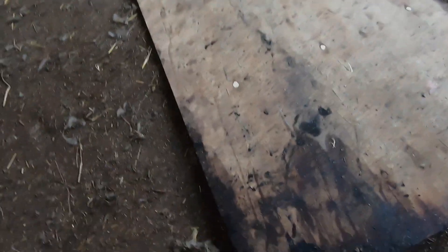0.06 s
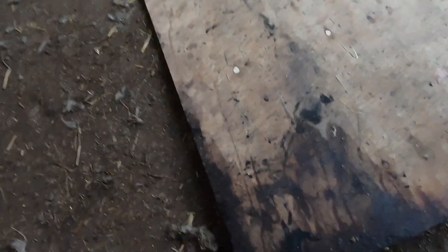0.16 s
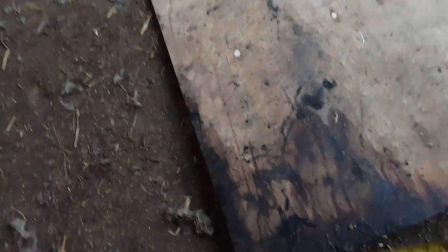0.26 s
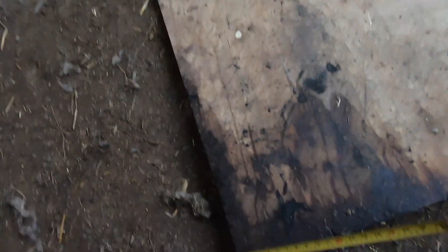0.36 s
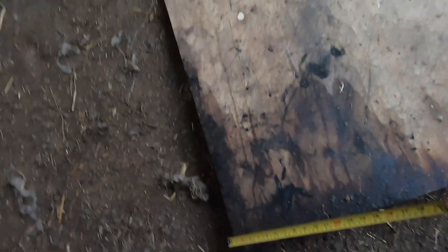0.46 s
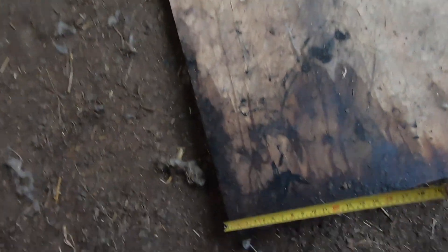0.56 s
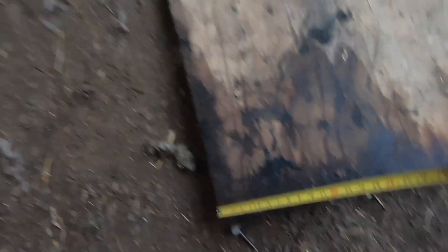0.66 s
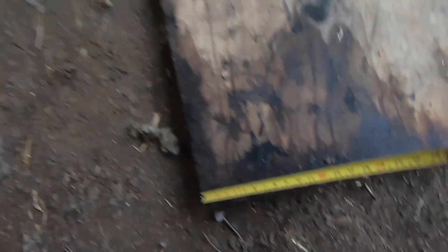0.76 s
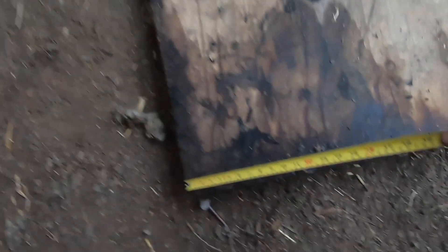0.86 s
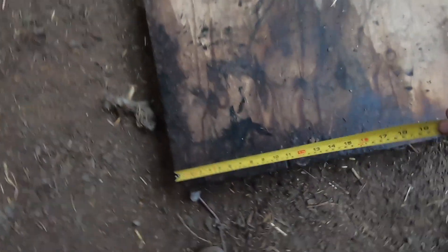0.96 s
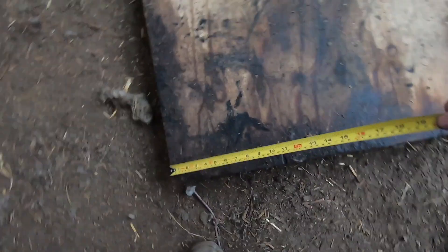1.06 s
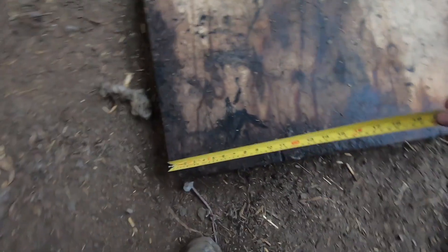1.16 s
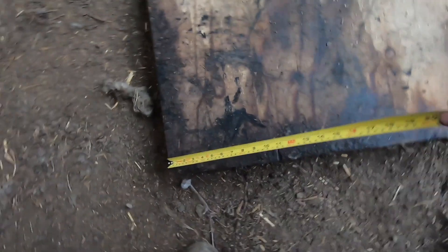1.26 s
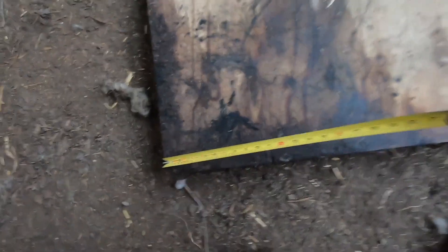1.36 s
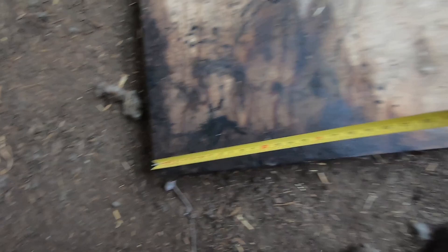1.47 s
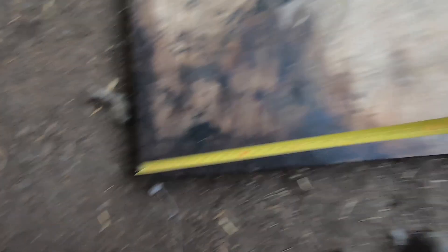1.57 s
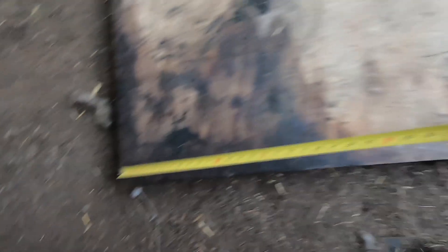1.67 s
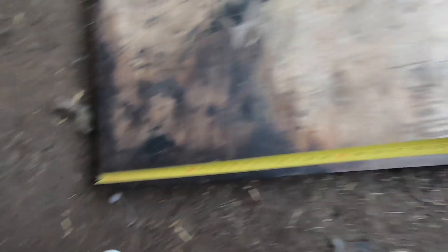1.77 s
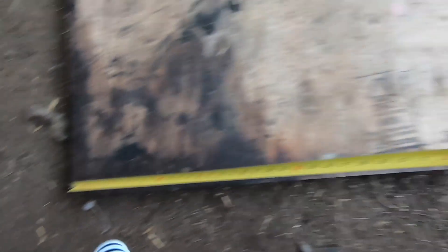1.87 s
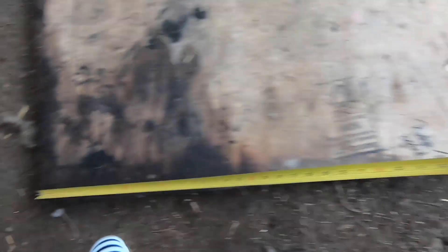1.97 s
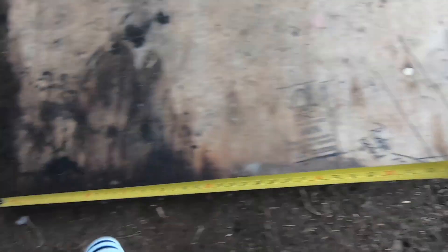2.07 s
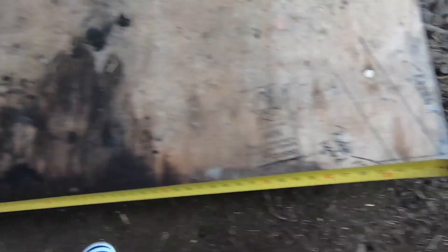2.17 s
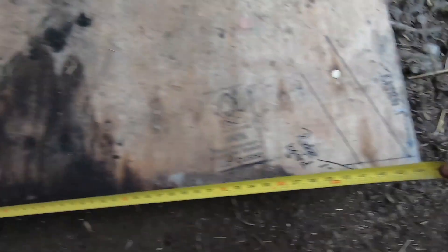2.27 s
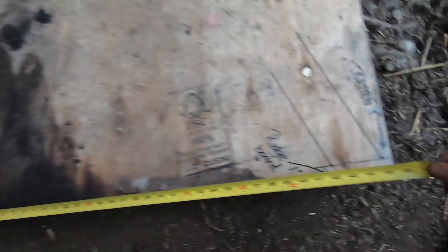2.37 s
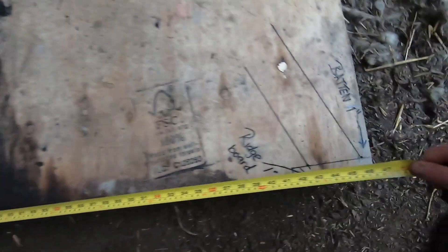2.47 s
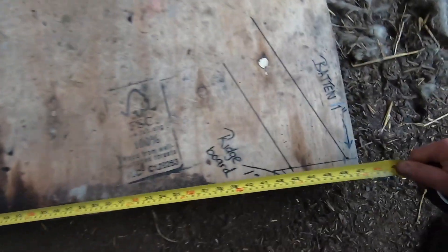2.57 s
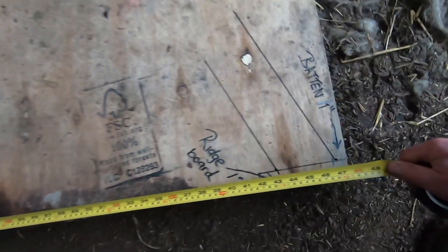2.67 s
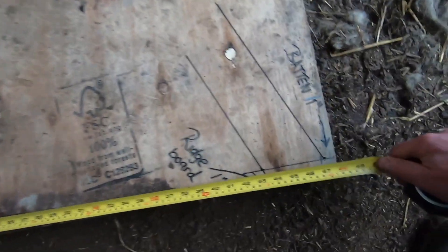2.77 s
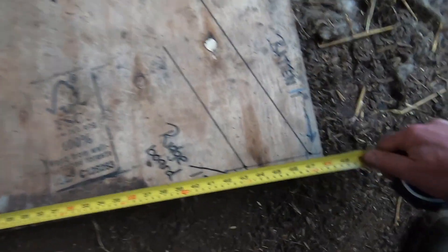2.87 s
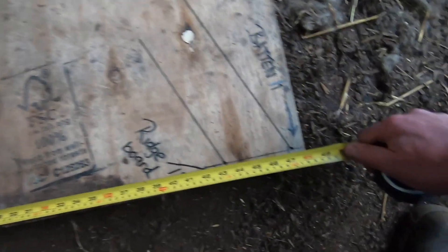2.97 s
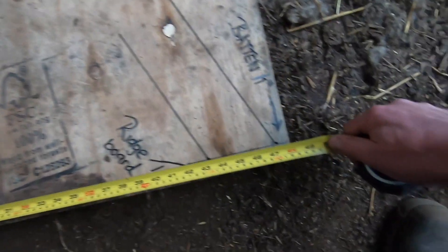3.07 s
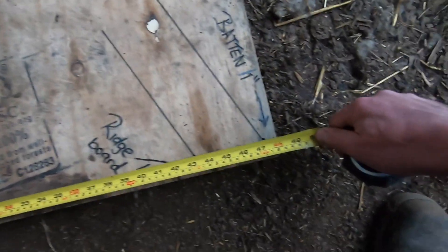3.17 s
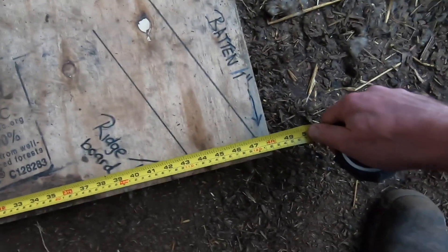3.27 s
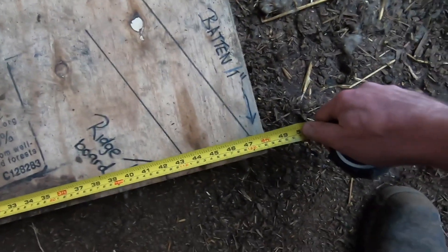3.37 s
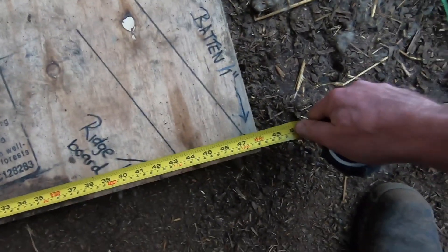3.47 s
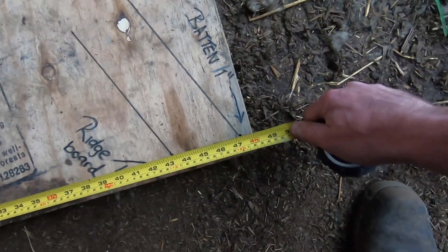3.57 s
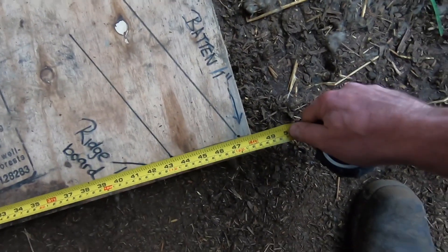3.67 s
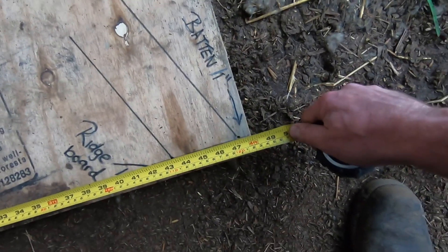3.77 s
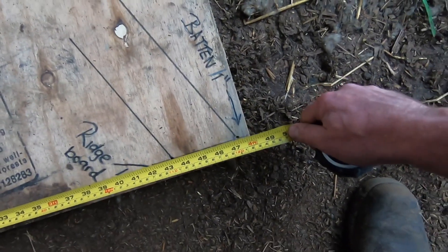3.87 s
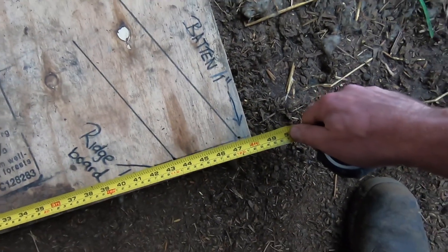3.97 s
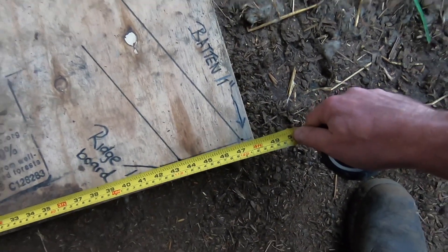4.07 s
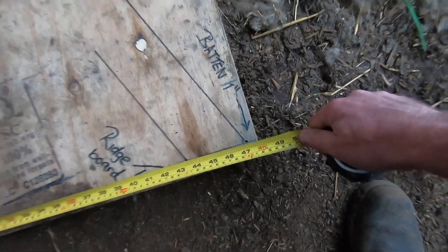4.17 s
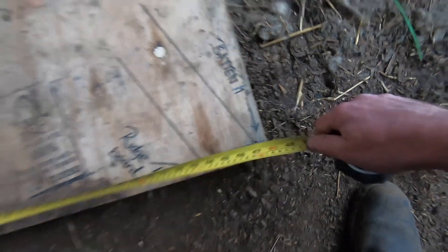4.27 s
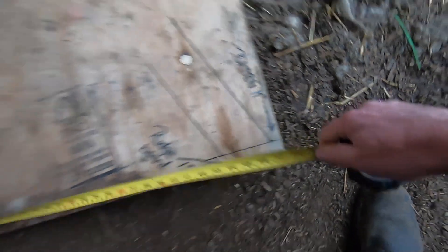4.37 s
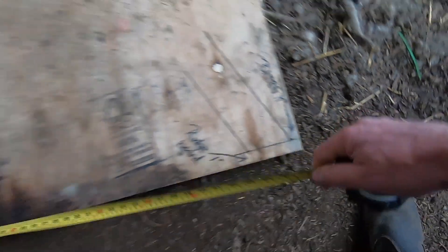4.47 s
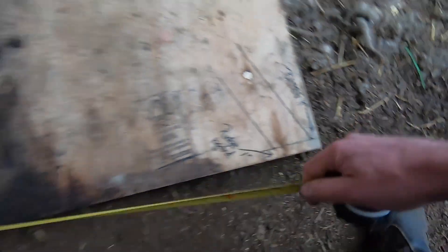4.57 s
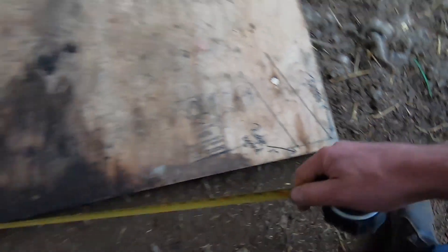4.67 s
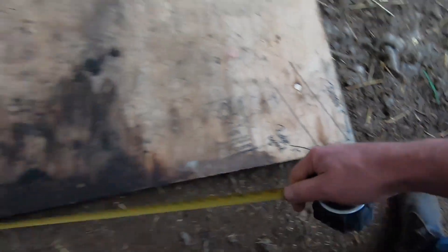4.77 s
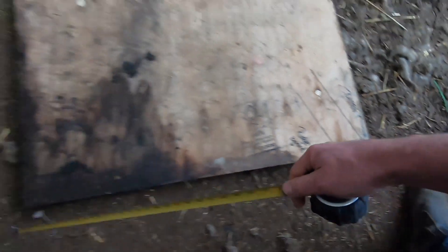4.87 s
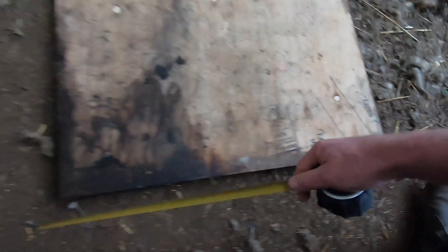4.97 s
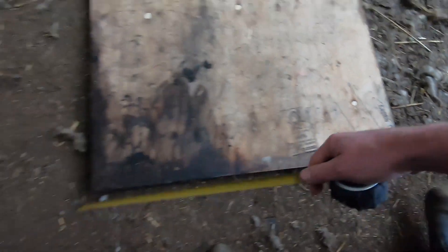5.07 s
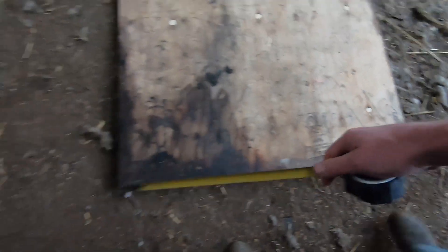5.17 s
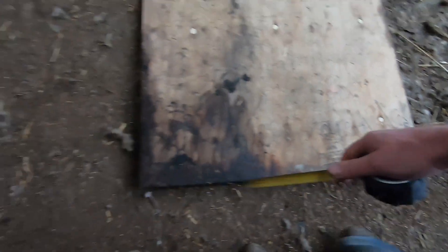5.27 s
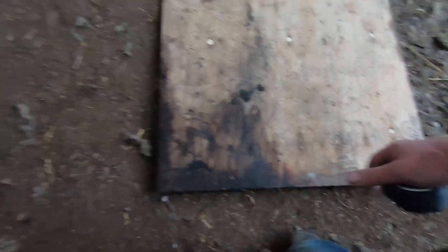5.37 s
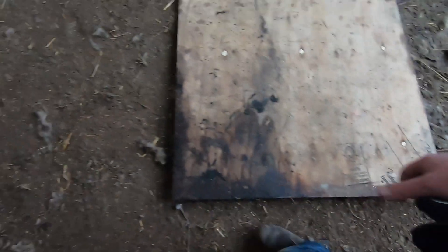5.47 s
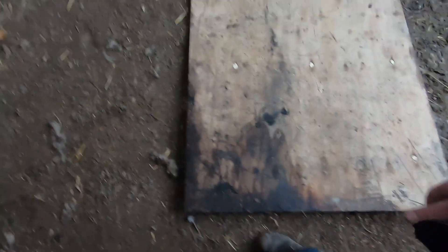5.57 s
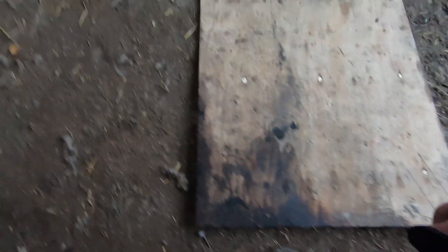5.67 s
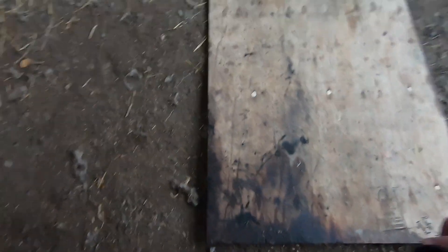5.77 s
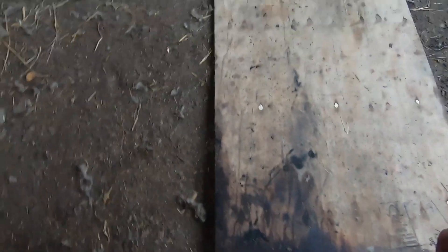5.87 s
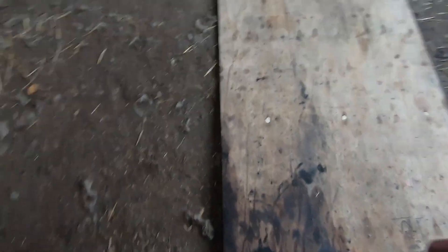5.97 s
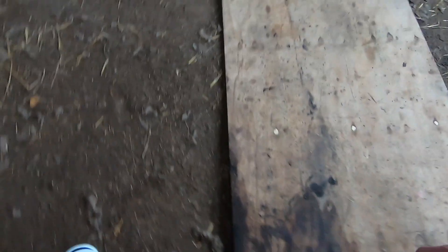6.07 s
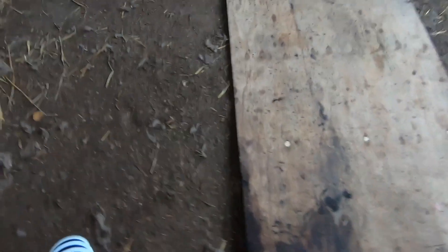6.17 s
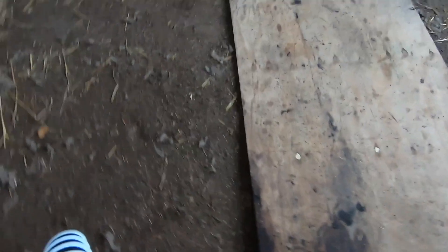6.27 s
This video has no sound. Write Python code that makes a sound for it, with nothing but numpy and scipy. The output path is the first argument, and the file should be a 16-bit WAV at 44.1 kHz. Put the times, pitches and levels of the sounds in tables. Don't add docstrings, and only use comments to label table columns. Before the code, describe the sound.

Thin steel tape slides out with a scratchy hiss over a wooden board, rests, rattles back into its case and ends with a hard snap.

```python
import sys
import numpy as np
from scipy import signal
from scipy.fft import rfft, irfft, next_fast_len
from scipy.io import wavfile
from scipy.ndimage import uniform_filter1d

SR = 44100
rng = np.random.default_rng(int(sys.argv[2]) if len(sys.argv) > 2 else 0)


def attenuation_scalar(level_db):
    decades = np.asarray(level_db, float) / 20
    return 10 ** decades


def dump_mix(stems):
    frames = np.atleast_2d(stems).T
    limited = np.clip(frames, -1, 1)
    pcm = np.round(limited * 32767).astype(np.int16)
    wavfile.write(sys.argv[1], SR, pcm)


N = 279347
TIMES_S = np.arange(0, N + 64, 64) / SR


def evened(x):
    return x / np.sqrt(np.mean(x ** 2) + 1e-20)


def read(points, hz):
    table_hz, value = np.transpose(points)
    return np.interp(np.log(hz + 1), np.log(table_hz + 1), value)


def curves(rows):
    s, *columns = np.transpose(rows)
    return [np.interp(TIMES_S, s, column) for column in columns]


def fine(control):
    return np.interp(np.arange(N) / SR, TIMES_S, control)


def summed(levels_db):
    return 10 * np.log10(sum(attenuation_scalar(2 * db) for db in levels_db))


def add(mix, s, sound):
    part = mix[:, round(s * SR):][:, :sound.shape[1]]
    part += sound[:, :part.shape[1]]


def sides(pan_db):
    return attenuation_scalar(np.array([pan_db / 2, -pan_db / 2]))


def bends(modes, hz):
    power = sum(attenuation_scalar(2 * db) / (1 + (2 * (hz - mode_hz) / width_hz) ** 2) for mode_hz, width_hz, db in modes)
    return 10 * np.log10(power + 1e-9)


def smoothed_noise(count, width):
    return evened(uniform_filter1d(rng.standard_normal(count), width))


def wander(seconds):
    width = round(seconds * SR)
    return evened(uniform_filter1d(smoothed_noise(N, width), width))


# frequency in Hz, left-right likeness 0-1.
LIKENESS = [(130, 0.8), (600, 0.68), (1400, 0.23), (3100, 0.83), (6800, 0.028), (15000, 0.09)]


def ports(drives, colour_db, likeness=None):
    size = next_fast_len(drives.shape[1])
    hz = np.fft.rfftfreq(size, 1 / SR)
    a, b = rfft(drives, size)
    c = np.clip(read(LIKENESS, hz) if likeness is None else likeness, 0, 1)
    coloured = np.array([a, c * a + np.sqrt(1 - c ** 2) * b]) * attenuation_scalar(colour_db(hz))
    return evened(irfft(coloured, size)[:, :drives.shape[1]])


def rub(spectrum, flutter_db, grit_db, likeness=None, patch_db=0):
    drive = rng.standard_normal((2, N)) * attenuation_scalar(flutter_db * wander(0.049) + grit_db * wander(0.00015))
    if patch_db:
        z = signal.stft(drive, nperseg=512)[2]
        spots = rng.standard_normal((2, *z.shape[1:]))
        streaks = evened(uniform_filter1d(spots[0], size=26, axis=1))
        patches = evened(uniform_filter1d(uniform_filter1d(spots[1], size=7, axis=0), size=9, axis=1))
        z = z * attenuation_scalar(patch_db * (0.9 * streaks + 0.62 * patches))
        drive = signal.istft(z, nperseg=512)[1][:, :N]
    return ports(drive, lambda hz: read(spectrum, hz), likeness)


# frequency in Hz, level in dB per Hz.
SHED = [(150, -17.5), (250, -9), (400, -14.5), (580, -18.5), (800, -9), (1000, -19), (1500, -18.5),
        (3000, -28.5), (7400, -42), (9000, -39), (15500, -65)]


def shed_air():
    return attenuation_scalar(-67.5) * rub(SHED, 0.27, 0.26, 0.035)


# start in seconds, sheet dB, air dB, rise in seconds, fall in seconds.
SHIFTS = [(0, -61, -55, .1, 0.24), (.88, -67, -55.5, 0.49, 0.44), (1.42, -43.5, -63, 0.16, 0.083),
          (1.59, -48, -50, 0.14, 0.21), (1.75, -54.5, -67, 0.51, 0.74), (2.1, -63, -51, 0.046, 0.074),
          (2.57, -89, -48.5, 0.54, 0.062), (4.55, -58, -51, 0.19, 0.29), (4.73, -47, -70, 0.39, 0.22),
          (5.66, -56, -66, 0.11, 0.18), (6.21, -63, -74, 0.6, 0.22)]


def shifts():
    sheet_db, air_db = [], []
    for s, sheet, air, rise_s, fall_s in SHIFTS:
        fade_db = -29.5 * np.maximum((s - TIMES_S) / rise_s, (TIMES_S - s) / fall_s)
        sheet_db.append(sheet + fade_db)
        air_db.append(air + fade_db)
    return sheet_db, air_db


# frequency in Hz, level in dB per Hz.
SHEET = [(100, -61.5), (140, 12), (210, 12.5), (260, 5.5), (330, -8), (500, -58)]


def sheet_rumble():
    rest_db = -68.5
    return attenuation_scalar(fine(summed(shifts()[0] + [rest_db]))) * rub(SHEET, 1.94, 0.091, 0.78)


# frequency in Hz, level in dB per Hz.
AIR = [(15, -0.5), (40, 3.5), (85, -9), (125, -39), (200, -66)]


def puffs():
    rest_db = -73.5
    return attenuation_scalar(fine(summed(shifts()[1] + [rest_db]))) * rub(AIR, 2.2, .1, .3)


# time in seconds, blade speed as hiss dB,
# freedom 0-1 (1 = blade glides over the steel mouth, 0 = coil drags in the case).
PULL = [
    (1.3, -66.5, 0.26),
    (1.39, -47.5, 0.59),
    (1.46, -46.5, 0.75),
    (1.74, -44.5, 1),
    (2.04, -47, 0.97),
    (2.52, -50, 0.82),
    (2.7, -56.5, 0.47),
    (2.81, -58, 0.49),
    (2.97, -82, .4),
]
FEED = [
    (4.3, -75, 0.27),
    (4.38, -57, 0.4),
    (4.45, -47, 0.54),
    (4.65, -47.5, 0.46),
    (4.72, -42.5, 0.68),
    (4.85, -50.5, 0.46),
    (5.1, -53, 0.33),
    (5.2, -47, 0.51),
]
RUSH = [
    (5.1, -77, 0.41),
    (5.22, -49.5, 0.17),
    (5.34, -43.5, 0.39),
    (5.42, -43, 0.14),
    (5.47, -48, 0.076),
    (5.54, -46, 0.064),
    (5.62, -55, 0),
    (5.73, -66.5, 0),
    (5.8, -81, 0.034),
]
HANDS = [(0, -67, 0.26), (.4, -66.5, 0.3), (.67, -70.5, 0.47), (.79, -59, 0.34), (.92, -75.5, 0.24),
         (1.18, -74, 0.5), (1.32, -61.5, 0.31), (2.9, -67, 0.3), (3.08, -73.5, 0.49), (3.44, -82, 0.42),
         (3.75, -82.5, 0.64), (4.05, -76, 0.52), (4.3, -75.5, 0.3), (4.45, -80, .3)]
STOW = [
    (5.6, -72, 0),
    (5.75, -70, 0),
    (5.9, -77.5, 0),
    (6.11, -71.5, 0),
    (6.15, -69.5, 0),
    (6.33, -69.5, 0.07),
]
# stroke, fizz over hiss in dB, wood scuff over case in dB.
STROKES = [
    (PULL, -18, -15),
    (FEED, -22, -6),
    (RUSH, -18.5, -17),
    (HANDS, -20.5, -1.2),
    (STOW, -34, 1),
]


def strokes():
    drag_db, freed_case_db, freed_fizz_db = 7.5, -21, 10.5
    shoved_wood_db = -4
    layers = []
    for rows, fizz_db, wood_db in STROKES:
        speed_db, free = curves(rows)
        idle = (TIMES_S < rows[0][0]) | (TIMES_S > rows[-1][0] + .03)
        speed_db = speed_db - 100 * idle
        case_db = speed_db + drag_db + freed_case_db * free
        layers.append([speed_db, case_db, case_db + wood_db, speed_db + fizz_db + freed_fizz_db * free])
    blade_db, case_db, wood_db, fizz_db = [summed(layer) for layer in zip(*layers)]
    wood_db = summed([wood_db, summed(shifts()[0]) + shoved_wood_db])
    return blade_db, case_db, wood_db, fizz_db


# frequency in Hz, level in dB per Hz.
BLADE = [(2300, -59.5), (3400, -13.5), (4000, -8.5), (4750, -3), (5500, -3), (5900, -4), (7400, -0.5),
         (8100, -5.5), (8700, -11.5), (10500, -35)]
CASE = [(710, -27), (1200, -5.5), (1530, -5.5), (1820, -4), (2280, -1.5), (2790, -2.5), (3160, -2.5),
        (3840, -3.5), (4110, -7.5), (4600, -8.5), (5980, -36.5), (10100, -120)]
WOOD = [(90, -45), (210, 0.5), (350, 0.5), (589, -1), (676, 0), (877, -4.5), (1050, -3.5), (2340, -9.5),
        (3960, -120)]
FIZZ = [(7800, -42), (8800, -2), (10200, 3.5), (11500, -5), (13400, -8), (14500, -29), (15500, -29)]
# time in seconds, left-right pan in dB.
PLACE = [(0, -1), (1.4, 0), (2.5, 0), (4.5, 0), (5.0, -0.5), (5.4, -1), (5.55, 3), (6.33, -2)]


def slide():
    blade_db, case_db, wood_db, fizz_db = map(fine, strokes())
    tape = attenuation_scalar(blade_db) * rub(BLADE, 0.94, 1.4, patch_db=3.5)
    tape += attenuation_scalar(case_db) * rub(CASE, 1.7, 1.0, patch_db=2.5)
    tape += attenuation_scalar(fizz_db) * rub(FIZZ, 0.97, 1.5, patch_db=2.5)
    tape += attenuation_scalar(wood_db) * rub(WOOD, 1.64, 0.93)
    squeaks(tape)
    return sides(fine(curves(PLACE)[0])) * tape


# frequency in Hz, width in Hz, level in dB.
STEEL = [(3700, 110, 0), (4510, 1600, 1.5), (4990, 920, 5.5), (6310, 400, 3)]
STEEL_TOP = [(7300, 1260, 2.5), (9800, 1040, -6), (10540, 1200, -11.5)]


def tick(db, ring_hz, pan_db, t60_s, treble_db, rise_s, steel_db, length_s=0, under_db=-4):
    t = np.arange(round(.2 * SR)) / SR
    after = np.maximum(t - length_s - rise_s, 0)
    wash = attenuation_scalar(-17.5 - 60 * after / 0.29)
    shape = np.minimum(t / rise_s, 1) ** 0.55 * (attenuation_scalar(-60 * after / max(t60_s, .004)) + wash)
    modes = [(ring_hz, 0.21 * ring_hz, 0), (0.7 * ring_hz, 0.21 * ring_hz, under_db)]
    modes += [(900, 900, -17)]
    modes += [(hz, width, level_db + steel_db) for hz, width, level_db in STEEL]
    modes += [(hz, width, level_db + treble_db) for hz, width, level_db in STEEL_TOP]
    grit = attenuation_scalar(1.7 * (length_s > 0) * smoothed_noise(len(t), 90))
    burst = ports(rng.standard_normal((2, len(t))), lambda hz: 1.57 * bends(modes, hz))
    if not length_s:
        phases = rng.uniform(0, 2 * np.pi, (len(modes), 1, 1)) + rng.normal(0, 0.9, (len(modes), 2, 1))
        first = t[:800]
        blow = sum(attenuation_scalar(1.52 * mode_db - 60 * first / 0.0095) * np.sin(2 * np.pi * hz * first + phase)
                   for (hz, _, mode_db), phase in zip(modes, phases))
        burst = 0.83 * burst + 1.36 * np.pad(blow, ((0, 0), (0, len(t) - len(first))))
    return attenuation_scalar(db - 8.5) * sides(pan_db)[:, None] * shape * grit * burst


# start
# in seconds, peak in dB, ring in Hz, treble in dB.
TICKS = [(0.1476, -23, 4600, -1.5), (0.1517, -18.5, 5200, -5), (.161, -22, 7400, -4),
         (0.1653, -23, 4780, -18), (0.188, -33.5, 5109, -2), (0.4578, -30.5, 5430, -3),
         (0.472, -39, 5270, -1), (.485, -44, 4700, -1), (0.494, -44.5, 4600, -9), (0.5435, -37.5, 7300, 0),
         (.553, -50, 4900, -8), (.563, -50, 7400, -4), (.657, -53, 7300, 0), (.6825, -44, 7200, -2),
         (.695, -47, 7300, 0), (.703, -43, 7240, 3), (0.7342, -38, 4620, -11), (.742, -38, 3500, -12),
         (0.7468, -28, 5100, -4), (0.776, -36, 7500, -6), (0.7974, -24, 4360, -16),
         (0.8018, -26.5, 3940, -4), (1.121, -53, 1866, -3), (1.276, -37, 2880, -8), (3.153, -53, 4384, -9),
         (3.369, -55.5, 1783, -17), (4.21, -62, 3500, -6), (4.6165, -27.5, 6000, -1),
         (4.619, -33, 3900, -3), (4.7068, -18, 7200, -10), (4.7101, -14, 7000, -4.5),
         (4.7123, -30, 5400, -10), (4.7165, -25, 3500, -12), (4.723, -26, 4500, -1),
         (4.7338, -24, 5030, -1), (4.7415, -22, 7100, -2), (4.751, -20, 4030, -5), (4.759, -18, 4770, -3.5),
         (4.7643, -19, 4050, -6), (4.776, -25, 4600, -4), (4.825, -26.5, 3770, -15), (5.481, -32, 7000, -4),
         (5.842, -48.5, 1690, -30), (5.898, -64, 7000, 3), (5.911, -54, 2500, -20), (6.069, -62, 7000, 1),
         (6.127, -44, 3580, -21), (6.134, -50, 3880, -25), (6.142, -43, 3600, -25), (6.159, -46, 2500, -20)]


def sharp_ticks(tape):
    for s, db, ring_hz, treble_db in TICKS:
        pan_db = 2.5 * rng.standard_normal()
        t60_s = 0.022 - 0.001 * (db + 20)
        add(tape, s, tick(db, ring_hz, pan_db, t60_s, treble_db, rise_s=0.0011, under_db=-7.5,
                          steel_db=-5.5 + 0.3 * treble_db))


def thud(db, ring_hz, t60_s, knock_db):
    t = np.arange(round(.27 * SR)) / SR
    ring = np.sin(2 * np.pi * ring_hz * t) + 0.2 * np.sin(2 * np.pi * 1.2 * ring_hz * t)
    ring *= (1 - np.exp(-t * ring_hz / 1.1)) * attenuation_scalar(-60 * t / max(t60_s, .01))
    overtone = np.sin(2 * np.pi * 2.26 * ring_hz * t)
    ring += 0.14 * overtone * np.minimum(t / 0.0011, 1) * attenuation_scalar(-60 * t / 0.02)
    shudder = ports(rng.standard_normal((2, len(t))),
                    lambda hz: 1.9 * bends([(ring_hz, 0.5 * ring_hz, 0)], hz), 0.95)
    shudder *= np.minimum(t / 0.0085, 1) * attenuation_scalar(-60 * t / max(2.58 * t60_s, .01))
    ring = ring + 0.15 * shudder
    ring = signal.sosfilt(signal.butter(2, ring_hz / 2, "high", fs=SR, output="sos"), ring)
    knock = ports(rng.standard_normal((2, len(t))),
                  lambda hz: read(WOOD, hz) - 6.8 * np.log2(1 + hz / 1200), 0.96)
    knock *= attenuation_scalar(knock_db - 60 * t / 0.077)
    return attenuation_scalar(db) * (ring + knock * np.minimum(t / 0.0013, 1))


# start in seconds, peak
# in dB, ring in Hz, knock over ring in dB.
THUDS = [(.155, -29.5, 232, -9.5), (.188, -33, 203, -18), (.461, -39, 226, -11), (.469, -39, 233, -16),
         (.549, -46, 213, -13.5), (.696, -48, 238, -28), (.804, -36, 243, -7.5), (.8125, -28, 239, -17.5),
         (.842, -35.5, 224.6, -17), (1.288, -46, 255, -7), (1.378, -38, 298, -3.5),
         (1.424, -41.5, 245, -0.5), (1.489, -49.5, 264, 4), (2.13, -49.5, 252, -11),
         (2.307, -47.5, 296, -8), (4.287, -56, 452, 4.5)]
BUMPS = [(1.396, -21, 228, -16.5), (1.513, -40, 215, -18), (1.592, -28, 228, -11), (1.618, -31, 221, -30),
         (1.672, -37, 182, -15), (2.084, -38, 168, -45), (4.672, -33, 258, -13), (4.854, -40.5, 272, -3.5),
         (5.613, -43, 288, -8), (5.882, -45, 206, -15), (6.125, -29, 436, -12.5),
         (6.153, -33.5, 180, -10.5)]


def sheet_thuds(ground):
    for rows, t60_s in [(THUDS, 0.12), (BUMPS, 0.047)]:
        for s, db, ring_hz, knock_db in rows:
            add(ground, s, thud(db, ring_hz, t60_s, knock_db))


# start in seconds, peak in dB, ring in Hz,
# t60 in seconds, knock in dB.
STEPS_AND_BUMPS = [(0.5, -45.5, 243, 0.083, -28), (0.871, -43.5, 150, 0.22, -30), (1.397, -41, 107, 0.12, -30),
                   (1.56, -38, 273, 0.027, -10), (1.5715, -5.5, 208.4, 0.031, -29), (4.778, -44.5, 212.4, 0.22, -25),
                   (5.65, -32.5, 110, 0.053, -31), (6.128, -31.5, 184.6, 0.067, -22), (5.423, -28, 600, 0.023, -9.5),
                   (5.46, -21.5, 277, 0.026, -10), (5.647, -27, 232, 0.033, -30), (5.909, -36.5, 432, 0.033, -15.5),
                   (5.942, -47, 440, 0.061, -27), (5.262, -33.5, 302, 0.021, -10.5)]


def steps_and_bumps(ground):
    for s, *blow in STEPS_AND_BUMPS:
        add(ground, s, thud(*blow))


# start in seconds, end in seconds, frequency in Hz, width in Hz, level in dB.
SQUEAKS = [(1.1, 1.3, 1870, 200, -68.5), (1.22, 1.42, 1870, 250, -62), (5.97, 6.05, 457, 100, -59.5),
           (1.78, 1.95, 2130, 200, -63), (1.7, 1.88, 7000, 500, -54), (1.82, 2.15, 4850, 250, -64),
           (1.9, 2, 5500, 290, -57), (1.5, 3, 3880, 260, -62.5), (2.3, 2.52, 7350, 250, -57),
           (2.5, 2.82, 4900, 350, -58), (2.48, 2.64, 6000, 380, -53.5), (2.55, 2.76, 2660, 660, -58),
           (1.27, 1.32, 750, 250, -58), (2.93, 3.1, 2000, 500, -72.5), (4.02, 4.2, 1760, 1400, -72),
           (0.53, 0.73, 4530, 400, -75), (5.42, 5.456, 1300, 650, -48), (4.52, 4.7, 2150, 300, -54.5),
           (4.69, 4.8, 2300, 410, -45.5), (2.72, 2.88, 6000, 500, -63), (5.42, 5.456, 4300, 1300, -51),
           (4.6, 4.72, 3750, 300, -65), (4.43, 4.52, 6300, 900, -52), (4.44, 4.9, 580, 85, -60),
           (5.2, 5.33, 2300, 300, -59), (5.27, 5.42, 5460, 380, -47), (5.49, 5.62, 2370, 500, -49),
           (5.48, 5.74, 3670, 220, -59), (5.47, 5.66, 7100, 500, -53), (1.41, 1.435, 910, 250, -46),
           (2.498, 2.525, 4560, 400, -49)]


def squeaks(tape):
    for start, end, ring_hz, width_hz, db in SQUEAKS:
        span = round((end - start) * SR)
        squeak = ports(rng.standard_normal((2, span)), lambda hz: 2 * bends([(ring_hz, width_hz, 0)], hz))
        shape = signal.windows.tukey(span, .8) * attenuation_scalar(1.1 * smoothed_noise(span, 300))
        add(tape, start, attenuation_scalar(db) * squeak * shape)


# time in seconds, peak in dB, ring in Hz, pan in dB.
CLACKS = [(1.359, -44, 4470, -3), (1.3678, -37.5, 3740, -8), (1.4172, -35, 4640, -5),
          (1.391, -39, 3000, -1), (1.399, -44, 4200, -3), (1.489, -40, 3300, -10), (1.5863, -36, 3300, -7),
          (1.9204, -45, 3530, 0), (2.187, -43.5, 3300, -5), (2.378, -45.5, 2000, -4),
          (2.2966, -27.5, 3780, 2), (2.5064, -36, 4850, 3), (2.557, -37.5, 4300, 0)]
DULL_CLACKS = [(1.7478, -34, 3600, -1), (1.7505, -30, 2500, -4), (1.752, -26, 3600, -10),
               (1.753, -30, 4380, -3), (5.3615, -35, 1530, -12), (4.851, -33, 5000, 1),
               (4.856, -32, 3920, 5), (4.95, -38, 5500, 0), (5.008, -39, 3520, 3), (5.259, -25, 2900, -1),
               (5.183, -34, 4900, 0), (5.147, -41, 3200, 0), (5.2275, -32, 3100, 0), (5.26, -37, 2900, -2),
               (5.3235, -22, 3500, -4.5), (5.406, -33, 2300, -4), (5.0886, -26.5, 3170, -1),
               (5.1355, -26.5, 3320, 2), (5.2085, -29, 2370, -1), (5.2216, -23.5, 3220, -1),
               (5.254, -28, 3200, -2), (5.3195, -24, 3550, -8), (5.3578, -39, 2340, -9)]


def coil_slaps(tape):
    for rows, t60_s, treble_db, steel_db in [(CLACKS, 0.042, -9, -9.5), (DULL_CLACKS, 0.023, -16.5, -15)]:
        for s, *slap in rows:
            add(tape, s - .001, tick(*slap, t60_s, treble_db, rise_s=0.0016, steel_db=steel_db))


# start in seconds, peak in dB, ring in Hz, length in seconds, pan in dB.
SCRAPES = [(1.38, -40, 2820, 0.042, .5), (1.501, -43, 3220, 0.011, -8), (4.686, -32, 3580, 0.02, 1),
           (4.709, -27.5, 3750, 0.059, 5.5), (4.793, -36, 4300, 0.021, 2), (5.425, -23, 2380, 0.013, -5),
           (5.434, -27, 4940, 0.023, -3), (4.935, -39, 4900, 0.015, 1), (4.997, -40, 3500, 0.01, 0),
           (5.035, -40, 5200, 0.016, -1), (5.348, -34, 2620, 0.014, -2), (5.822, -65.5, 7600, 0.049, -7),
           (6.265, -64, 7000, .04, 0), (1.722, -36, 7500, 0.013, 0)]


def edge_scrapes(tape):
    for s, db, ring_hz, length_s, pan_db in SCRAPES:
        add(tape, s, tick(db, ring_hz, pan_db, 0.023 + length_s, -11.0, rise_s=0.0066, steel_db=-9.5,
                          length_s=length_s))


# time in seconds, frequency in Hz, level in dB.
HUM = [
    (2.45, 157.6, -88),
    (2.65, 158.7, -68),
    (3.2, 156.8, -70),
    (3.55, 156.6, -59),
    (4.12, 155.2, -61),
    (4.35, 153, -86),
]


def engine_hum():
    hum_hz, hum_db = map(fine, curves(HUM))
    level = np.sqrt(2) * attenuation_scalar(hum_db + 0.9 * wander(0.021) + 0.8 * wander(.09))
    return level * np.sin(2 * np.pi * np.cumsum(hum_hz) / SR)


# time in seconds, peak in dB, ring in Hz, pan in dB, t60 in seconds, treble in dB.
CATCH = (5.449, -25, 8000, -3, .04, 0)


def rivet_catch(tape):
    add(tape, CATCH[0], tick(*CATCH[1:], rise_s=.001, steel_db=-5))


# time in seconds, left peak in dB, right peak in dB.
SNAP = (5.4578, -5, .4)
# frequency in Hz, left level in dB, right level in dB, t60 in seconds.
SNAP_MODES = [(930, -6, 12.5, 0.0038), (1500, -18, 10.5, 0.01), (1870, 0, 1.5, 0.016), (2710, 7, 10, 0.012),
              (2900, -21, 4, 0.0082), (4200, 2, -25, 0.0033), (4920, 2.5, -2, 0.014),
              (6920, -7.5, -13, 0.015), (9000, -15, -20, 0.0086), (11100, -20, -22, .006)]


def hook_snap(ground):
    t = np.arange(round(.04 * SR)) / SR
    right = np.array([[0], [1]])
    rings = 0
    for hz, left_db, right_db, t60_s in SNAP_MODES:
        turn = np.pi / 2 * (hz > 4000) * right
        rings = rings + attenuation_scalar([[left_db], [right_db]] - 60 * t / t60_s) * np.sin(2 * np.pi * hz * t + turn)
    rings = np.gradient(rings * np.minimum(t / .0002, 1), axis=1)
    blows = np.zeros((1, 300))
    for lag_s, db in [(0, -17), (.0012, 0), (.0021, -9), (.0033, -13), (.0052, -20)]:
        blows[0, round(lag_s * SR)] = attenuation_scalar(db)
    rings = signal.fftconvolve(rings, blows, axes=1)
    peaks = attenuation_scalar(np.array(SNAP[1:]))[:, None]
    add(ground, SNAP[0] - .001, peaks * rings / abs(rings).max(1, keepdims=True))


# frequency in Hz, left-right level in dB.
LEAN = [(60, -3), (150, -6), (380, -1), (950, -8.5), (2380, -7.5), (5980, -1.5), (15000, -12.5)]


def shade(tape):
    size = next_fast_len(N)
    lean_db = read(LEAN, np.fft.rfftfreq(size, 1 / SR)) + 2.0
    return irfft(rfft(tape, size) * sides(lean_db), size)[:, :N]


def scene():
    ground = shed_air() + sheet_rumble() + puffs() + engine_hum()
    tape = slide()
    sharp_ticks(tape)
    sheet_thuds(ground)
    steps_and_bumps(ground)
    coil_slaps(tape)
    edge_scrapes(tape)
    rivet_catch(tape)
    hook_snap(ground)
    return shade(tape) + ground


def low_pass(x):
    return signal.sosfilt(signal.butter(12, 15610, fs=SR, output="sos"), x)


def record(dry):
    peak_db = 10 * np.log10(abs(uniform_filter1d((dry ** 2).max(0), 40)) + 1e-12)
    recovery_db = np.arange(N) * 410.0 / SR
    held_db = np.maximum.accumulate(peak_db + recovery_db) - recovery_db
    over_db = np.maximum(held_db + 17, 0)
    late_db = np.roll(uniform_filter1d(over_db, 120), 170)
    low_cut = signal.butter(2, 25, "high", fs=SR, output="sos")
    ducked = signal.sosfilt(low_cut, dry / attenuation_scalar(0.8 * late_db))
    high_cut = signal.firwin(511, 15300, fs=SR)[None]
    mix = signal.oaconvolve(ducked, high_cut, "same")
    return low_pass(mix)


dry = scene()
out = record(dry)
dump_mix(out)
```